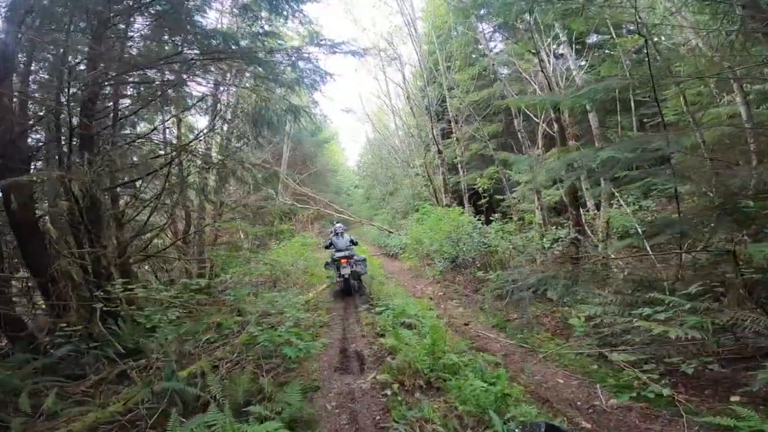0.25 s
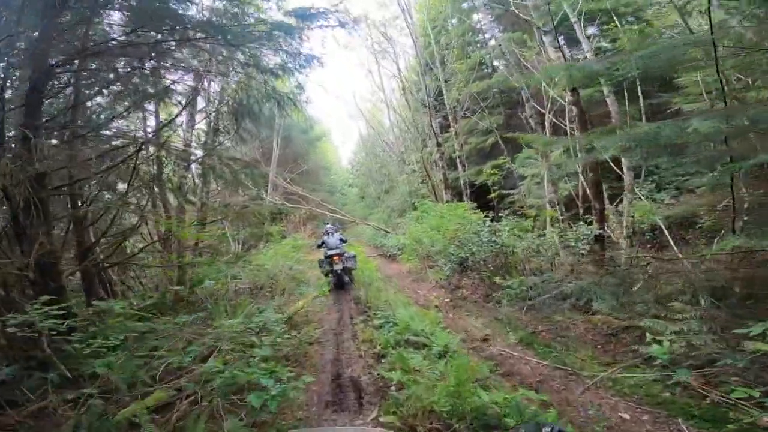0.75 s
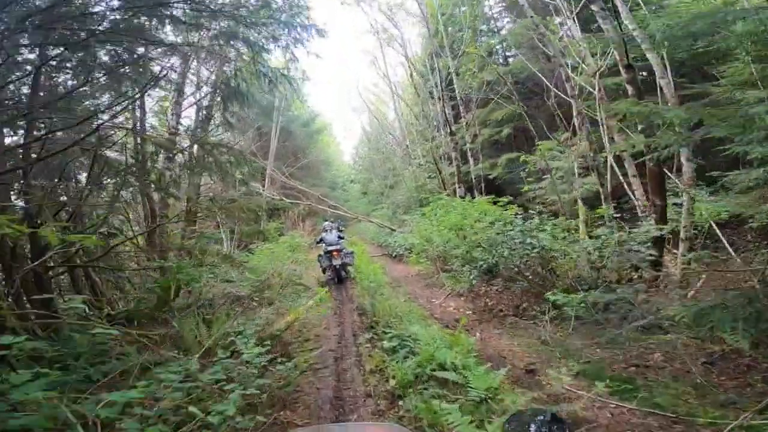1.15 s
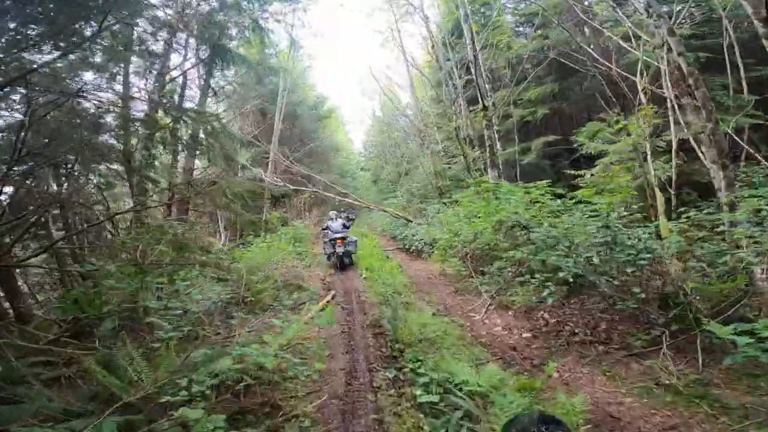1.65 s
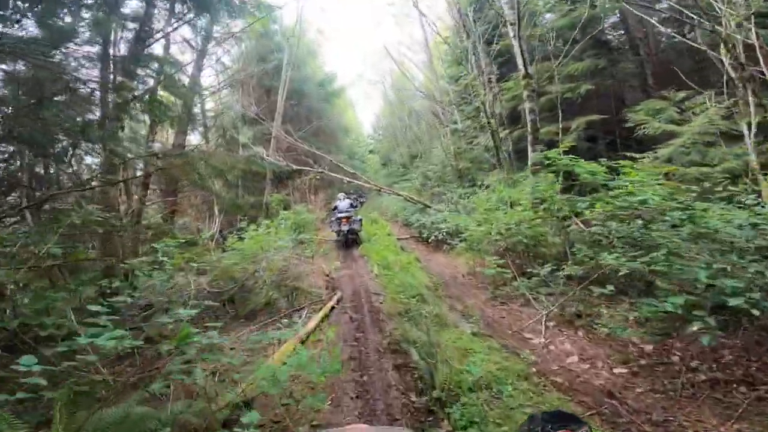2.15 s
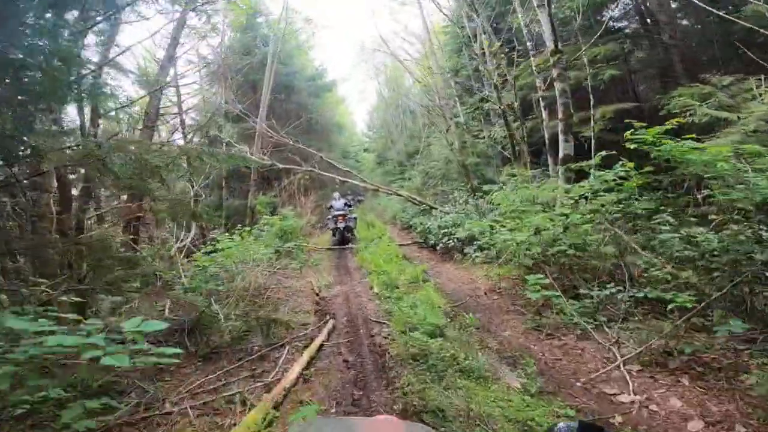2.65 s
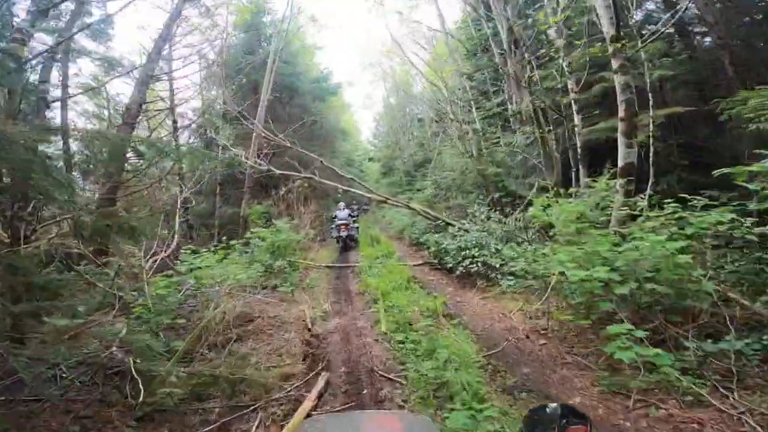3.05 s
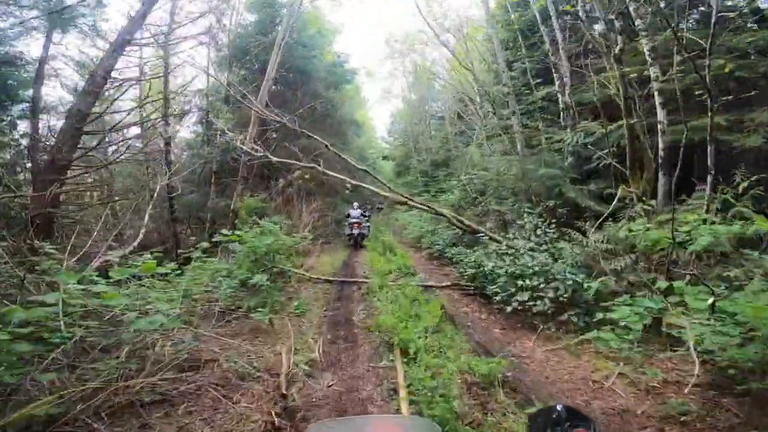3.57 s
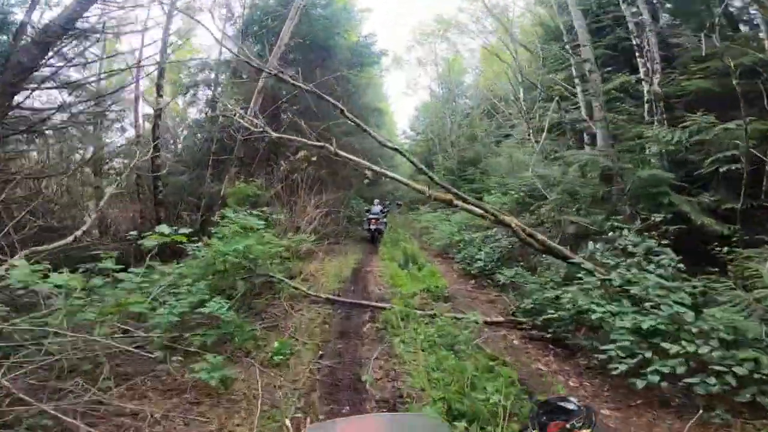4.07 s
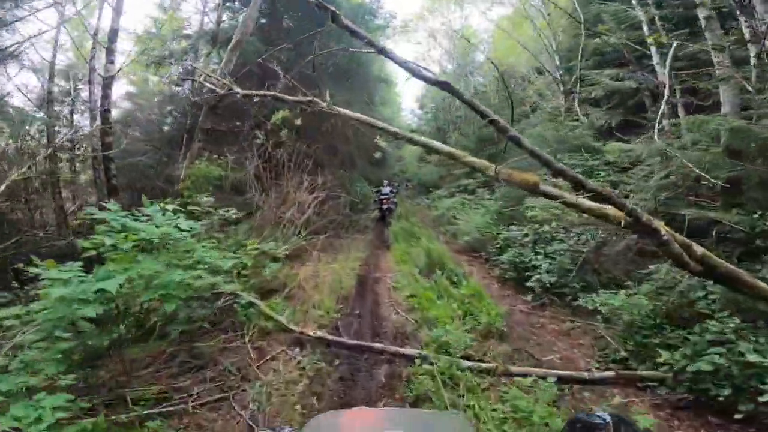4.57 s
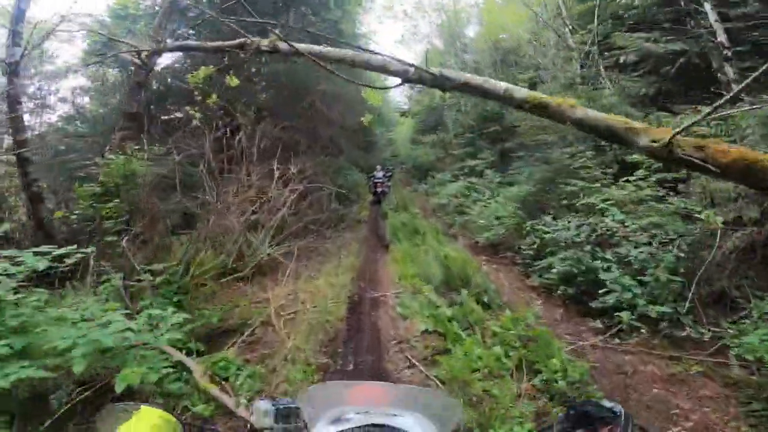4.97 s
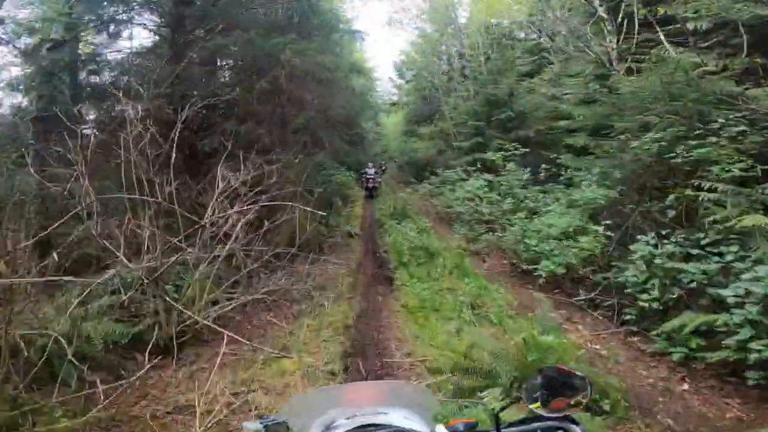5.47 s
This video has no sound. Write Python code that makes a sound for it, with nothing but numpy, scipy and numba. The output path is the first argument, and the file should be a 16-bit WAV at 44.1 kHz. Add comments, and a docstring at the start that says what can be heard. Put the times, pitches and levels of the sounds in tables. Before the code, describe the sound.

Close, hollow knocks punctuate the deep, throbbing rumble of a moving motorcycle as wind buffets the microphone.

```python
"""A motorcycle following another on a rutted forest track, heard from a camera on the rider's helmet.
The engine's beat shakes the helmet, the exhaust chugs, and wind buffets the two microphone ports.
Gears whine through the rasp of engine, chain and tyres. Right at the microphone, knocks ring the
camera mount: loud jolts, and small taps from the exhaust's chug. Along the track, brush crackles
and twigs tick. Near the end the stereo image narrows to the middle."""
import sys
import numpy as np
from scipy import signal
from scipy.fft import rfft, irfft, next_fast_len
from scipy.io import wavfile
from scipy.ndimage import uniform_filter1d
from numba import njit

SR = 44100
rng = np.random.default_rng(int(sys.argv[2]) if len(sys.argv) > 2 else 0)


def inscribe(sig):
    """Save sig as 16-bit PCM at rate SR to the path in sys.argv[1].

    A 1-D sig is mono; a 2-D sig holds one channel per row.
    Samples are clipped to [-1, 1] before scaling.
    """
    pcm = np.round(np.clip(np.atleast_2d(sig).T, -1, 1) * 32767)
    wavfile.write(sys.argv[1], SR, pcm.astype(np.int16))


N = 252252

# engine speed and strength: t/s, beat f/Hz, beat level/dB, gear whine base level/dB
ENGINE_RUN = [(0.0, 37.78, -27.5, -55), (.14, 43.1, -30.5, -51), (.25, 49.23, -24.5, -48),
              (.4, 52.9, -16.5, -42.5), (.55, 56.24, -39, -41), (.8, 58.5, -33.5, -42),
              (.92, 59.06, -24.5, -44), (1.0, 57.73, -33, -42.5), (1.08, 51.3, -36, -44),
              (1.15, 45.9, -16, -48.5), (1.24, 43.68, -19.5, -70.5), (1.3, 45.92, -28.5, -75.5),
              (1.6, 46.28, -24.5, -82), (1.95, 40.46, -32.5, -79.5), (2.3, 45, -21.5, -80.5),
              (2.5, 39.15, -47.5, -57.5), (2.66, 38.65, -17, -57.5), (2.83, 39.33, -23.5, -54.5),
              (3.1, 39.57, -19.5, -60.5), (3.27, 41.8, -14, -55.5), (3.55, 43.65, -19.5, -55),
              (3.85, 45.46, -16, -54.5), (4.12, 44.86, -14.5, -52.5), (4.24, 42.56, -12.5, -50.5),
              (4.32, 43, -20, -49), (4.48, 46.75, -17.5, -53), (4.75, 48, -20.5, -57),
              (5, 49.76, -28.5, -65.5), (5.3, 51.59, -22.5, -62), (5.5, 51.9, -26, -47),
              (5.72, 49.4, -22.5, -68)]
# load on the drive: t/s, rasp base level/dB
DRIVE_LOAD = [(0.0, -45), (0.11, -42), (0.44, -41), (0.75, -39.5), (0.95, -42.5), (1.2, -44.5), (1.5, -48),
              (1.8, -48), (2.08, -45), (2.4, -46.5), (2.64, -42.5), (2.8, -45.5), (3.1, -44), (3.41, -47.5),
              (3.71, -50.5), (4.14, -49.5), (4.51, -50.5), (4.8, -49), (5.3, -42), (5.72, -43)]
MEAN_LOAD_DB = -47


def undb(db):
    """Decibels to gain."""
    return 10 ** (np.asarray(db) / 20)


def unit(x):
    """Scaled to rms 1."""
    return x / np.sqrt(np.mean(x ** 2))


def curves(table, rest=None):
    """Columns of a time table at every sample; rest, if given, holds outside it."""
    times, *columns = np.transpose(table)
    return [np.interp(np.arange(N) / SR, times, column, rest, rest) for column in columns]


def shape(x, gain_at):
    """Filter with a gain given as a function of frequency."""
    size = next_fast_len(N)
    freqs = np.arange(size // 2 + 1) * SR / size + 1
    return irfft(rfft(x, size) * gain_at(freqs), size)[:N]


def at(table, hz):
    """A spectrum table read on a log-frequency axis."""
    freqs, values = np.transpose(table)
    return np.interp(np.log(hz), np.log(np.maximum(freqs, 1)), values)


def walk(rate):
    """Random levels held 1 / rate s and smoothed twice; rms 1."""
    hold = int(SR / rate)
    steps = np.repeat(rng.standard_normal(N // hold + 1), hold)
    return unit(uniform_filter1d(uniform_filter1d(steps, hold), hold)[:N])


@njit
def spin(x, pole):
    """A decaying phasor pushed by x; the last pole holds to the end."""
    y, z = np.empty(len(x)), 0j
    for i in range(len(x)):
        z = z * pole[min(i, len(pole) - 1)] + x[i] + 1e-18
        y[i] = z.imag
    return y


def ring(x, hz, t60):
    """One resonant mode, steady or gliding."""
    return spin(x, np.exp(2j * np.pi * np.atleast_1d(hz) / SR - np.log(1000) / (t60 * SR)))


def ring_twice(x, hz, t60):
    """Two like modes in series, scaled to rms 1."""
    return unit(ring(ring(x, hz, t60), hz, t60))


def bands(spectrum, flicker_db, rate, gate):
    """Third-octave noise bands that flicker separately, all under one gate."""
    noise, out = gate * rng.standard_normal(N), 0
    low_hz, high_hz = spectrum[0][0], spectrum[-1][0]
    for hz in low_hz * 2 ** np.arange(0, np.log2(high_hz / low_hz) + 1 / 3, 1 / 3):
        window = lambda f: np.cos(np.pi / 2 * np.clip(3 * np.log2(f / hz), -1, 1)) ** 2
        band = shape(noise, lambda f: undb(at(spectrum, f)) * window(f))
        out = out + band * undb(flicker_db * walk(rate))
    return unit(out)


def engine_beat():
    """The beat felt in the helmet, a wavering tone with a weak octave; also returns its phase, 0 to 1."""
    hz, db, _ = curves(ENGINE_RUN)
    phase = np.cumsum(hz * (1 + .05 * walk(20))) / SR
    tone = np.sin(2 * np.pi * phase) + undb(-30.5) * np.sin(4 * np.pi * phase + 0.9)
    return np.sqrt(2) * undb(db + 0.34 * walk(20)) * tone, phase % 1


def chug(boost, per_s=12.68, first_s=.066, rise_s=.0028, fade_s=.022):
    """The exhaust's steady chug: a gain that jumps at each stroke and fades."""
    # how hard it chugs: t/s, depth/share
    depth = [(0, 0.63), (1.1, 0.68), (2.5, 0.4), (3.0, 0.088), (5.72, 0.13)]
    since = (np.arange(N) / SR - first_s) % (1 / per_s)
    stroke = np.minimum(since / rise_s, 1) * np.exp(-since / fade_s)
    return 1 + boost * curves(depth)[0] * stroke


def wind():
    """Gusts thump right on the microphone ports and set the helmet throbbing."""
    # gust strength: t/s, thump level/dB, throb level/dB
    gusts = [(0, -33.5, -38.5), (.4, -36, -38), (.68, -19.5, -24), (1.0, -24.5, -26.5), (1.3, -33, -29.5),
             (1.7, -31.5, -41), (2.05, -30.5, -26), (2.35, -24, -27.5), (2.7, -34.5, -24.5),
             (3.1, -26.5, -24.5), (3.5, -29, -26), (4.1, -25.5, -34), (4.5, -29.5, -35),
             (4.95, -30.5, -21.5), (5.35, -17, -31), (5.72, -24.5, -28)]
    thump_db, throb_db = curves(gusts)
    throb = ring_twice(rng.standard_normal(N), hz=43.7, t60=0.22)
    thumps = unit(shape(rng.standard_normal(N), lambda f: np.exp(-((f - 28) / 12.3) ** 2)))
    return undb(thump_db + 4.7 * walk(2.0)) * thumps + undb(throb_db) * throb


def boom_and_growl(phase):
    """The helmet shell booms and the exhaust growls above it, kicked by each beat, louder under load."""
    # rumble spectrum: f/Hz, relative level/dB
    spectrum = [(32, -32.5), (55, -10), (67, -11), (75, -15), (102, -13), (135, -17), (258, -20.5),
                (345, -34.5), (462, -36), (502, -44), (605, -39), (820, -50), (900, -47.5), (1170, -73.5),
                (1980, -120)]
    load_db = curves(DRIVE_LOAD)[0] - MEAN_LOAD_DB
    gate = chug(boost=2.5) * undb(walk(35)) * (1 + 1.5 * np.exp(-phase / 0.66))
    rumble = bands(spectrum, flicker_db=0.91, rate=11, gate=gate)
    boom = shape(rumble, lambda f: 1 / (1 + (f / 330) ** 8))
    growl = rumble - boom
    return undb(-31.5 + 0.53 * load_db) * unit(boom) + undb(-56 + 1.16 * load_db) * unit(growl)


def exhaust():
    """One firing every other beat, slightly uneven, rings the pipe."""
    # exhaust note: t/s, level/dB
    loudness = [(0, -51), (.3, -43.5), (.6, -39.5), (.9, -46.5), (1.15, -52.5), (2.0, -58.5), (2.7, -50),
                (3.4, -62), (5.0, -59), (5.72, -52.5)]
    # pipe resonances: f/Hz, relative level/dB, t60 per stage/s
    pipe_modes = [(138, 3.5, 0.1), (250, 2.5, 0.04), (500.4, -4.5, 0.0083)]
    firing_hz = curves(ENGINE_RUN)[0] / 2 * (1 + .006 * walk(15))
    pulses = np.diff(np.floor(np.cumsum(firing_hz) / SR), prepend=0) * undb(1.2 * walk(30))
    pipe = sum(undb(db) * ring_twice(pulses, hz, t60) for hz, db, t60 in pipe_modes)
    return undb(curves(loudness)[0]) * unit(pipe)


def rasp(phase):
    """Gritty noise of engine, chain and tyres, puffed once a beat and ringing in the engine cases."""
    # rasp spectrum: f/Hz, relative level/dB
    spectrum = [(290, -32), (500, -3), (818, -21.5), (1060, 0.5), (1210, -6), (1390, -2.5), (1540, -5),
                (1890, -6), (2350, -10.5), (2770, -13), (3130, -16.5), (3880, -19), (5790, -31),
                (7530, -44), (8000, -47), (8400, -64.5), (9000, -88)]
    # engine case modes: f/Hz, nominal width/Hz, relative level/dB
    case_modes = [(993, 88, -14), (1094, 25, -9), (1360, 110, -22), (1884, 20, -14.5), (2849, 120, -18.5),
                  (3069, 54, -20.5), (4470, 130, -26.5), (4670, 270, -24.5)]
    # how strongly the cases ring: t/s, gain/dB
    case_gain = [(0, 1.5), (.5, 1.5), (1.5, -0.5), (2.3, 1), (2.8, -1.5), (3.5, -1.5), (4.3, 1), (5.1, -3),
                 (5.72, 0)]
    db = curves(DRIVE_LOAD)[0]
    treble_db = -0.14 * (db - MEAN_LOAD_DB)  # duller as the load grows
    gate = (1 + 0.47 * np.exp(-phase / 0.092)) * undb(0.73 * walk(120))
    noise = bands(spectrum, flicker_db=1.8, rate=12, gate=chug(boost=0.12) * gate)
    low = shape(noise, lambda f: 1 / (1 + (f / 2400) ** 6))
    broad = low + undb(treble_db + 3) * (noise - low)
    push, cases = chug(boost=1.1) * gate * rng.standard_normal(N), 0
    for hz, width, mode_db in case_modes:
        gain = undb(mode_db + (hz > 2500) * (treble_db + 0.5) + 2.4 * walk(30))
        cases = cases + gain * unit(ring(push, hz, t60=3.4 / width))
    return undb(db) * (undb(0.3) * broad + undb(curves(case_gain)[0]) * cases)


def whine(hz, db, t60, core_db):
    """A gear mesh tone: a wavering core inside a blur from uneven teeth."""
    core = np.sqrt(2) * np.sin(2 * np.pi * np.cumsum(hz * (1 + 0.004 * walk(40))) / SR)
    blur = unit(ring(rng.standard_normal(N), np.maximum(hz, 100), t60))
    return undb(db) * (blur + undb(core_db + 1.4 * walk(45)) * core)


def early_gear(hz, db, shove_phase):
    """A gear pair whines with its companion gears and shakes the cases and a high-pitched cover."""
    mesh = (whine(hz, db + 2.5, t60=.027, core_db=-5.5)
            + whine(.9 * hz, db - 11.5, t60=.025, core_db=-12.5)
            + whine(.69 * hz, db - 7, t60=.033, core_db=-4.5)
            + whine(2.1 * hz, db - 17.5, t60=.017, core_db=-6.5)
            + whine(.24 * hz, db - 8, t60=.012, core_db=0))
    cases = undb(db - 12.5) * unit(ring(mesh, 1846, .035) + 0.49 * ring(mesh, 1370, .03))
    shove = undb(.8 * walk(50)) * unit(1.5 + np.exp(-shove_phase / .3))
    swell_db = 30 * np.log2(hz / 2100)  # the cover answers only near top speed
    cover = whine(np.full(N, 4600.), db - 10 + swell_db, t60=.018, core_db=-12.5)
    return shove * (mesh + cases) + cover


def late_gear(hz, db, shove_phase):
    """The next pair whines with a rough octave and a ringing cover, both chopped by the engine's shoves."""
    # octave of the mesh tone: t/s, level/dB
    octave_level = [(2.45, -69), (2.6, -53.5), (3.05, -51.5), (3.3, -52.5), (3.55, -62.5), (3.9, -61.5),
                    (4.25, -56.5), (4.6, -63.5), (5.1, -63), (5.72, -74)]
    # ring of the cover: t/s, level/dB
    cover_level = [(2.3, -85.5), (2.6, -61), (2.9, -68.5), (3.3, -62), (3.7, -71), (4.0, -71.5),
                   (4.25, -72.5), (4.45, -85)]
    mesh = whine(hz, db + 0.5, t60=.06, core_db=-7.5)
    octave = whine(2 * hz, curves(octave_level, -120)[0] + 0.67 * walk(40), t60=.016, core_db=-5.5)
    cover = whine(4540 * (1 + 0.014 * walk(3)), curves(cover_level, -120)[0], t60=.035, core_db=-11)
    chop = unit(0.32 + np.exp(-shove_phase / 0.48))
    return mesh + chop * (octave + cover)


def gears(meshes_per_beat=36, shift_s=1.8):
    """The gearbox whine follows engine speed and passes to another gear pair at the shift."""
    beat_hz, _, db = curves(ENGINE_RUN)
    hz = meshes_per_beat * beat_hz
    shove_phase = np.cumsum(beat_hz / 2) / SR % 1  # one shove every other beat
    before_shift = np.arange(N) < shift_s * SR
    return np.where(before_shift, early_gear(hz, db, shove_phase), late_gear(hz, db, shove_phase))


def knocks():
    """Knocks ring the camera mount: loud jolts, and small taps in time with the exhaust's chug."""
    # knocks: t/s, base level/dB, then offsets: hollow ring/dB, sharpness/dB, deep thud/dB, woody body/dB
    jolts_and_taps = [(0.308, -22, -25, -20.5, -8, 1), (0.385, -31.5, -14.5, -10.5, 6, 0.),
                      (0.804, -5.5, -14.5, -19.5, -13.5, -0.5), (0.941, -27.5, -25, -24.5, -16, 3),
                      (1.02, -30, -26.5, -16.5, 2, 4.5), (1.088, -7.5, -14, -35, -3, 2),
                      (1.249, -2, -19, -32, -28, 1), (1.496, -5.5, -14.5, -20, -31.5, -3),
                      (1.966, -31.5, -24, -20, -1.5, 4.5), (2.114, -5, -13.5, -17, -9.5, 0.),
                      (2.27, -21, -27, -16, 9.5, 3), (2.591, -29.5, -29.5, -23, -8.5, -1),
                      (2.726, -14, -37.5, -21.5, 6, 2.5), (3.172, -5.5, -9, -19, -4.5, 4.5),
                      (3.326, -6, -10, -15.5, -17.5, 2.5), (3.647, -26, -39.5, -38, -1, 0.),
                      (4.319, -9.5, -12.5, -15, -9, 0.5), (4.431, -30.5, -22, -38, -6.5, 1.5),
                      (4.542, -8, -16.5, -19, -17.5, -0.5), (4.727, -15, -15, -34.5, 0.5, -2.5),
                      (4.923, -18, -12.5, -33.5, 7.5, 2.5)]
    # modes of the mount: f/Hz, gain/dB, t60/s
    mount_modes = [(94, -13.5, 0.43), (174.5, -2, 0.12), (197.1, 5, 0.13), (225, -8, 0.036),
                   (250.7, -4.5, 0.091), (340, -22, 0.044), (345.4, -29.5, 0.22), (417.4, 2, 0.045),
                   (498.6, 5.5, 0.038), (698, -9, 0.083), (967, -0.5, 0.028), (1424, -0.5, 0.023),
                   (2100, -12, 0.014), (3020, -25.5, .008), (4630, -24.5, .008)]
    times, db, hollow_db, sharp_db, deep_db, body_db = np.transpose(jolts_and_taps)
    out = 0
    for hz, mode_db, t60 in mount_modes:
        offset_db = (sharp_db if hz > 800 else hollow_db if hz > 380 else body_db if hz > 215
                     else deep_db if hz < 180 else 0)
        lag_s = 0.0021 * min(200 / hz, 1) ** 0.87 - .0014  # bending waves: the lows travel slower
        polarity = 1 if hz > 800 else -1
        blows = np.zeros(N)
        blows[((times + lag_s) * SR).astype(int)] = polarity * undb(db + offset_db + mode_db)
        push = np.hanning(int(1.15 * SR / max(hz, 190)))  # padding rounds the push that each mode feels
        out = out + ring(signal.fftconvolve(blows, push / push.sum())[:N], hz, t60)
    return undb(4.5) * out


def brush(grains_per_s=160, grain_s=.0012, spread_octaves=.45):
    """Leaves and twigs sweep past in a dense crackle that swells and fades."""
    # passing brush: t/s, length/s, level/dB, centre f/Hz
    sweeps = [(0.504, 0.47, -79, 6400), (1.9, 0.4, -78, 6730), (2.443, 0.23, -76, 6670),
              (3.001, 0.18, -67, 5560), (5.026, 0.23, -69.5, 3500), (5.192, 0.16, -58, 3820),
              (5.452, 0.33, -74, 3950)]
    t, out = np.arange(N) / SR, 0
    grains = (rng.random(N) < grains_per_s / SR) * undb(-rng.exponential(size=N))
    crackle = rng.standard_normal(N) * signal.lfilter([1], [1, -np.exp(-1 / (grain_s * SR))], grains)
    for start, length, db, hz in sweeps:
        band = unit(shape(crackle, lambda f: np.exp(-(np.log2(f / hz) / spread_octaves) ** 2)))
        swell = np.sin(np.pi * np.clip((t - start) / length, 0, 1))
        out = out + undb(db) * band * swell
    return out


def twig_ticks(rise_s=.00059, size=4096):
    """Twigs and grit tick on the track: short bursts of band-limited noise."""
    # ticks: t/s, peak level/dB, centre f/Hz, t60/s
    ticks = [(0.8697, -21, 1670, 0.024), (2.615, -36.5, 1127, 0.024), (2.632, -50, 6700, 0.025),
             (3.065, -36, 4540, 0.084), (3.07, -34.5, 3040, 0.05), (3.44, -54, 6517, 0.022),
             (5.219, -40.5, 3570, 0.017), (5.248, -37, 3880, 0.017), (5.287, -36.5, 3920, 0.025),
             (5.312, -37, 3580, 0.018), (5.658, -30.5, 3810, 0.018), (5.681, -44, 3300, .02),
             (5.662, -30, 1530, 0.029)]
    out, t = np.zeros(N), np.arange(size) / SR
    for start, db, hz, t60 in ticks:
        band = signal.butter(3, [hz / 1.22, hz * 1.15], "band", fs=SR, output="sos")
        envelope = np.minimum(t / rise_s, 1) * 1000. ** (-t / t60)
        burst = signal.sosfilt(band, rng.standard_normal(size)) * envelope
        slot = out[int(start * SR):][:size]
        slot += (undb(db) * burst / np.abs(burst).max())[:len(slot)]
    return out


def roll_off(x, cutoff_hz=8360):
    """Above about 8 kHz the sound falls away steeply."""
    return shape(x, lambda f: 1 / (1 + (f / cutoff_hz) ** 24))


def port_difference(air, scattered, blows):
    """Side signal of two spaced ports: direct sound, sound scattered by helmet and trees, and knocks."""
    # side against mid: f/Hz, gain/dB
    side_gain = [(60, -17), (99, -25), (160, -24), (270, -18), (440, -1.5), (730, 7.5), (1200, 3),
                 (1970, -0.5), (3240, 2), (5340, -3), (7000, 3), (8000, -10.5)]
    # side against mid: f/Hz, phase/rad
    side_phase = [(30, 0.32), (200, 0.25), (310, 1.3), (430, 1.9), (560, 2.5), (710, 2.3), (880, 1.1),
                  (1090, 1), (1300, 3.54), (1900, 3.5), (2300, 3.3), (2750, 5.04), (3300, 4.94),
                  (3900, 5.6), (4700, 4.4), (6500, 6.2), (7500, 15)]
    # scattered share of the side: f/Hz, level/dB (capped at 0)
    scatter = [(200, -29.5), (330, -4), (800, 0), (1100, -5), (1500, -3.5), (1900, -17.5), (2300, -6),
               (2750, -2), (3300, -7), (4000, -3), (5500, 4), (6500, -4.5)]
    # the mount twists the ports against each other: f/Hz, gain/dB
    twist = [(100, -28), (200, -18), (300, -11), (420, 7), (600, 4), (1000, 2.5), (2000, 6)]
    gain = lambda f: undb(at(side_gain, f))
    turn = lambda f: np.exp(1j * at(side_phase, f))
    share = lambda f: undb(np.minimum(at(scatter, f), 0))
    direct = shape(air, lambda f: gain(f) * np.sqrt(1 - share(f) ** 2) * turn(f))
    diffuse = shape(scattered, lambda f: gain(f) * share(f))
    return direct + diffuse + shape(blows, lambda f: undb(at(twist, f)) * turn(f))


def scene():
    """Everything meets at the helmet's two ports; the colour shifts as the image narrows."""
    # stereo width: t/s, side gain/dB
    stereo_width = [(0, -2), (3.3, 0.5), (3.6, -5.5), (3.9, -16), (4.15, -23), (4.4, -34.5), (4.8, -49.5)]
    # colour of all but the knocks once narrowed: f/Hz, gain/dB
    air_colour = [(100, -1), (200, -0.5), (300, 3), (400, 2.5), (520, 3), (750, 6.5), (1100, -1),
                  (2000, -13), (3200, -2), (4600, 1), (6000, 1), (6900, -6), (7500, -22.5), (9000, -31)]
    # colour of the knocks once narrowed: f/Hz, gain/dB
    knock_colour = [(100, -4.5), (200, 1), (270, 8.5), (400, 11.5), (480, 0.5), (600, -18.5), (900, 2.5),
                    (2000, -17.5)]
    beat, phase = engine_beat()
    lows = beat + wind() + boom_and_growl(phase) + exhaust()
    air = lows + roll_off(rasp(phase) + gears() + brush()) + twig_ticks()
    blows = knocks()
    scattered = roll_off(rasp(phase) + gears())  # the same machine over other paths, unrelated in detail
    side = port_difference(air, scattered, blows)
    narrowed = shape(air, lambda f: undb(at(air_colour, f)))
    narrowed += shape(blows, lambda f: undb(at(knock_colour, f)))
    width = undb(curves(stereo_width)[0])
    wide_share = np.clip(width, 0, 1)
    mid = wide_share * (air + blows) + (1 - wide_share) * narrowed
    return np.array([mid + width * side, mid - width * side])


@njit
def follow(x, attack, release):
    """Envelope that rises and sinks by the given shares of the gap each sample."""
    y, level = np.empty(len(x)), 0.
    for i in range(len(x)):
        level += (x[i] - level) * (attack if x[i] > level else release)
        y[i] = level
    return y


def record(dry):
    """The camera's gain control ducks after loud blows; peaks are rounded and the top is cut steeply."""
    threshold, ceiling, top_hz = 0.3, .56, 14000
    level = follow(np.abs(dry).max(axis=0), attack=0.3, release=0.000083)
    ducked = dry * np.minimum(1, threshold / (level + 1e-6)) ** 0.38
    rounded = ducked / (1 + (np.abs(ducked) / ceiling) ** 6) ** (1 / 6)
    return signal.sosfilt(signal.ellip(8, .2, 60, top_hz, fs=SR, output="sos"), rounded)


dry = scene()
out = record(dry)
inscribe(out)
```